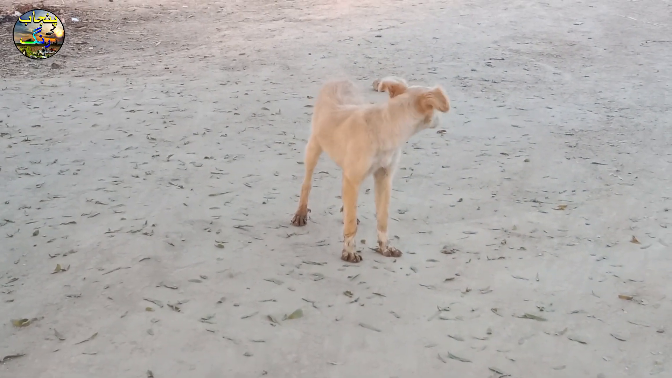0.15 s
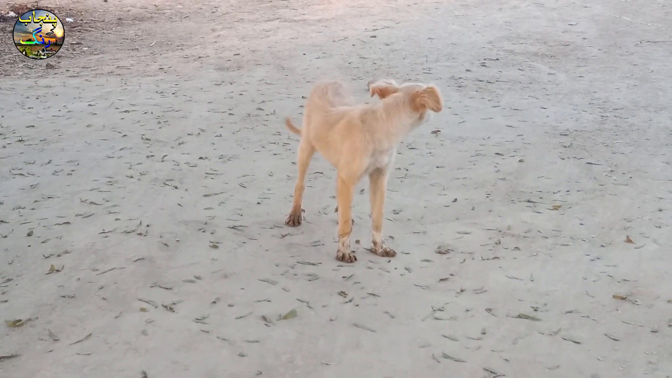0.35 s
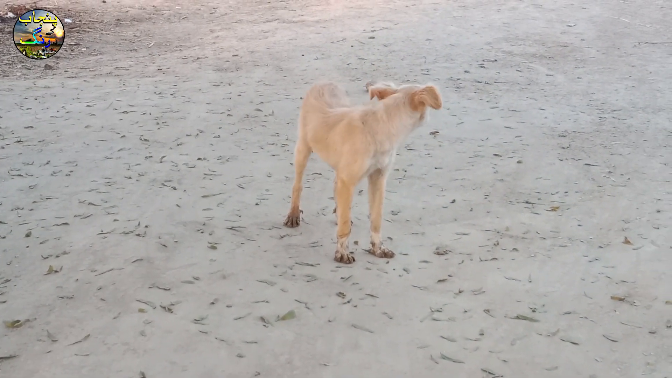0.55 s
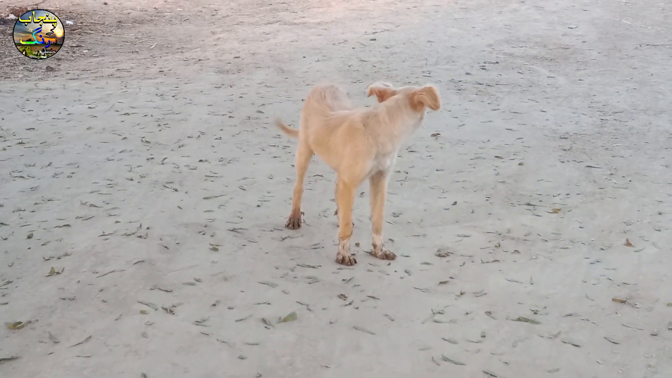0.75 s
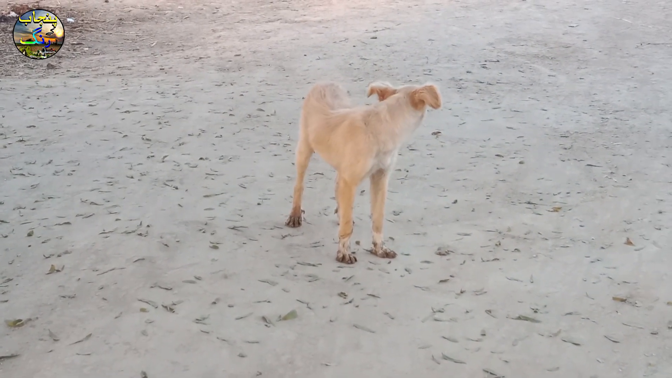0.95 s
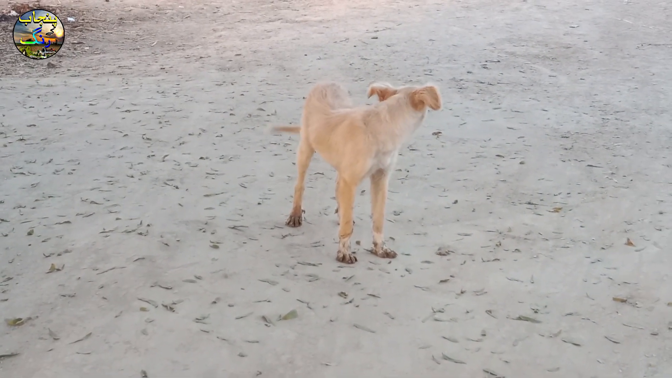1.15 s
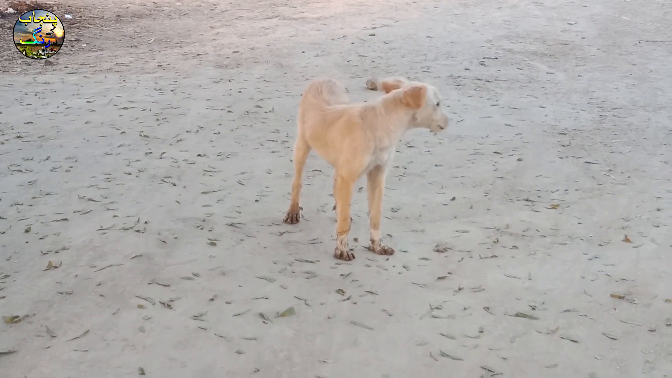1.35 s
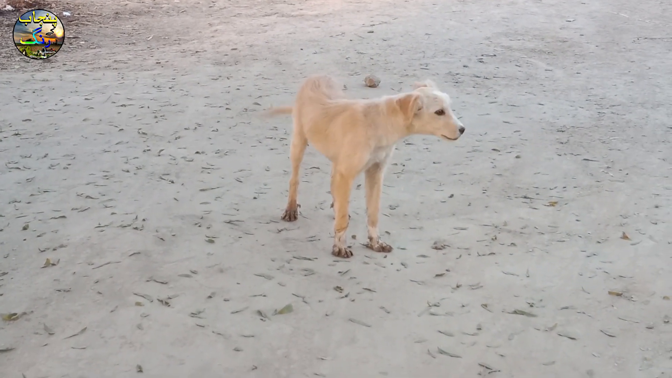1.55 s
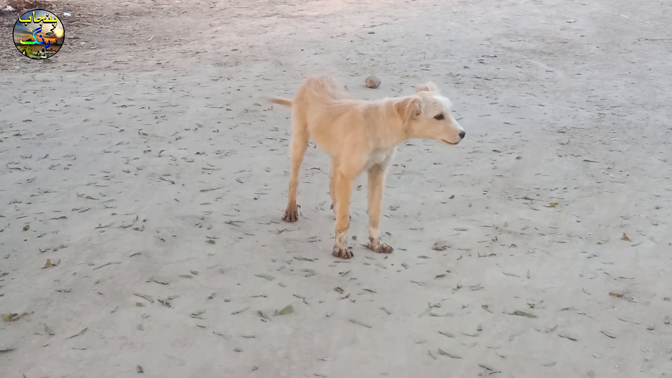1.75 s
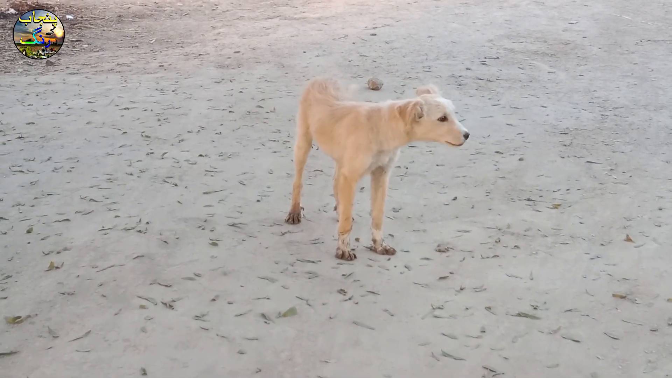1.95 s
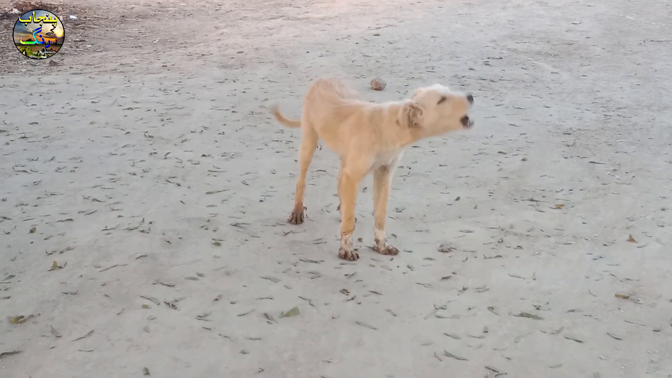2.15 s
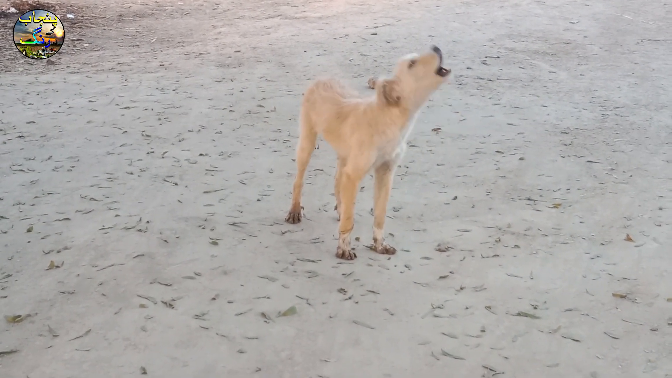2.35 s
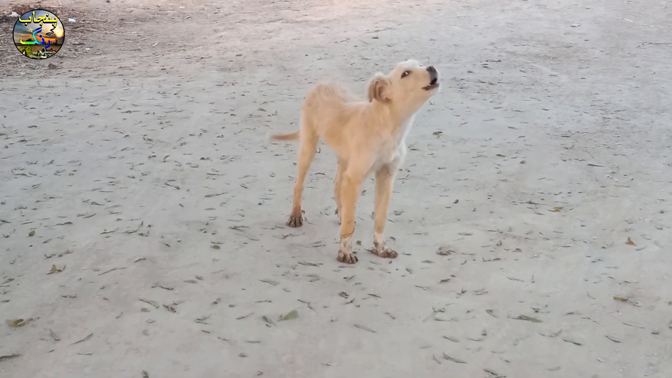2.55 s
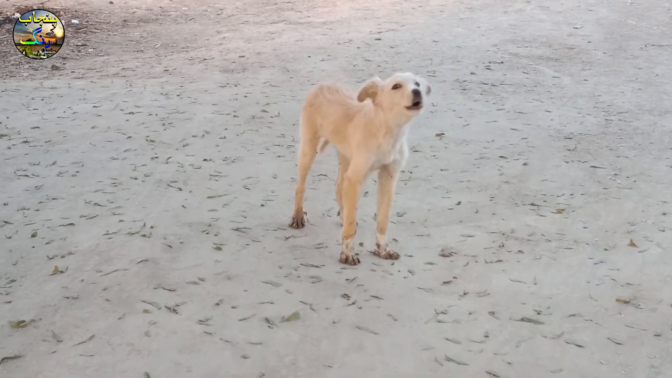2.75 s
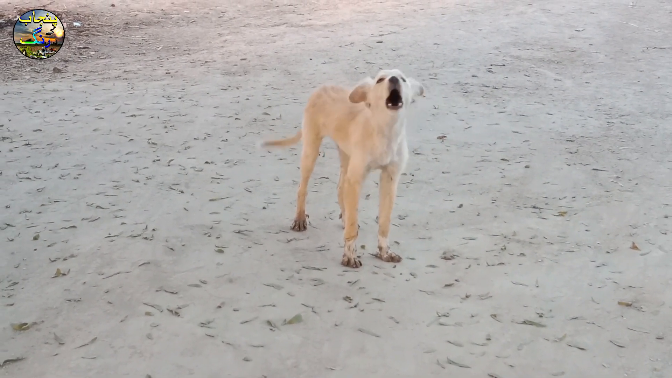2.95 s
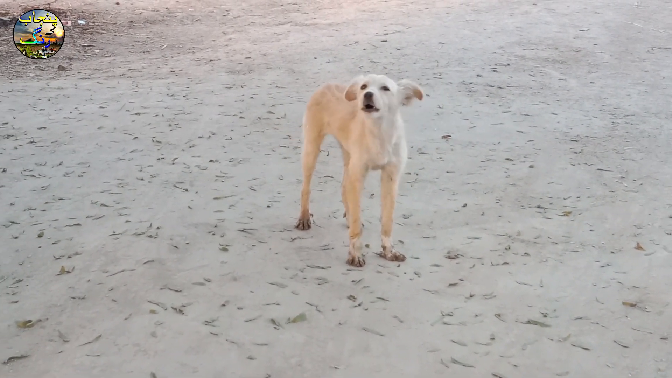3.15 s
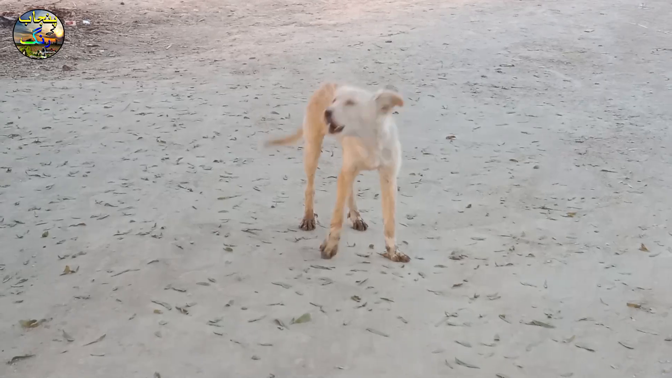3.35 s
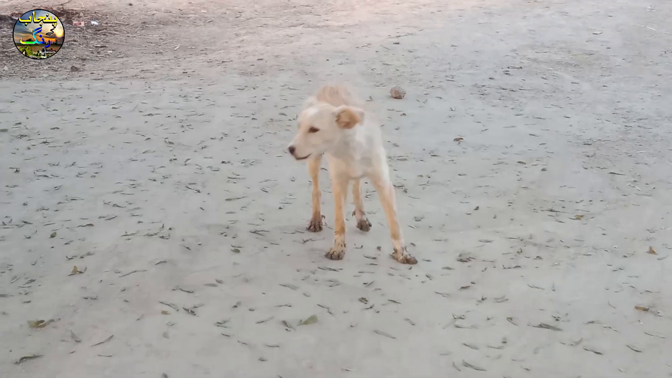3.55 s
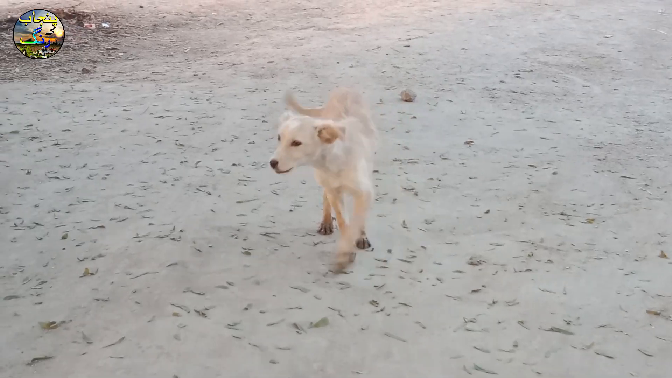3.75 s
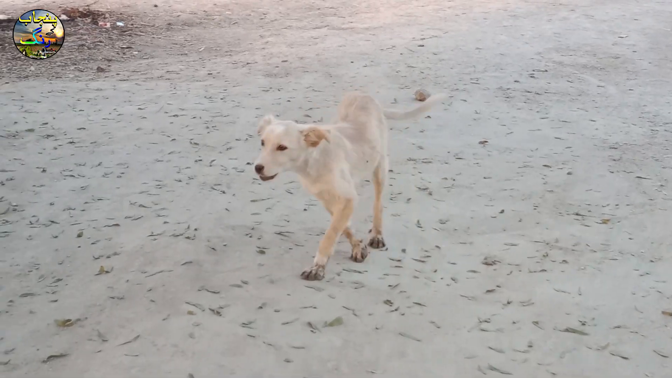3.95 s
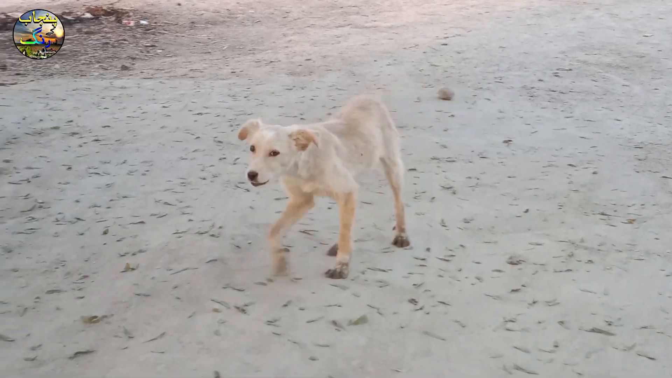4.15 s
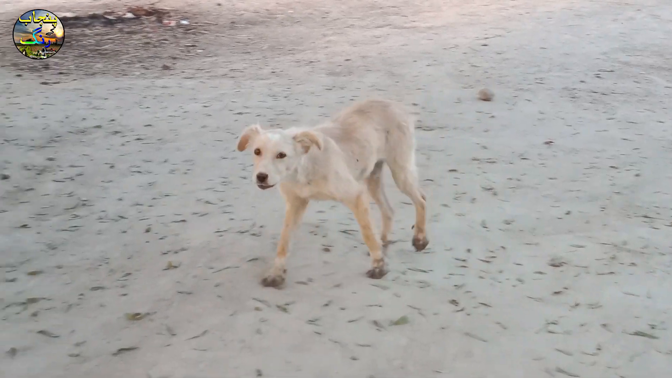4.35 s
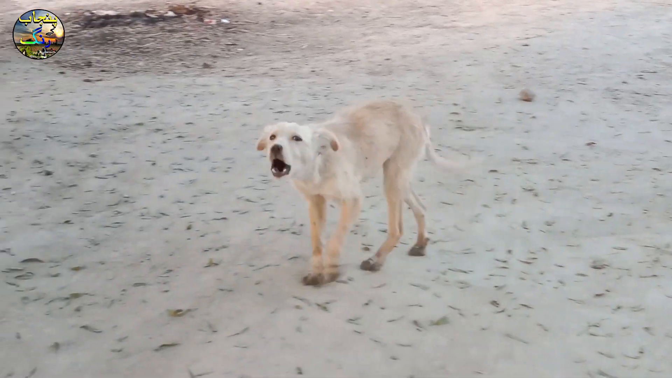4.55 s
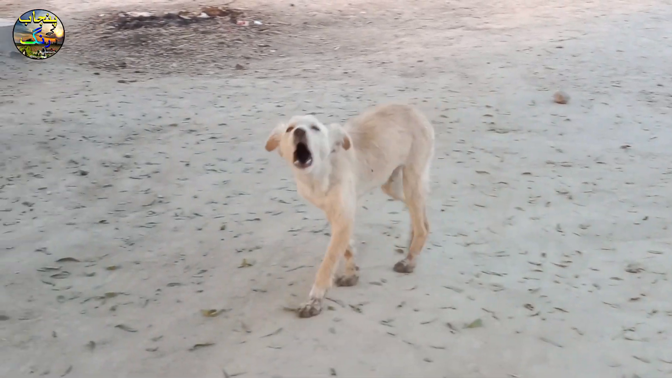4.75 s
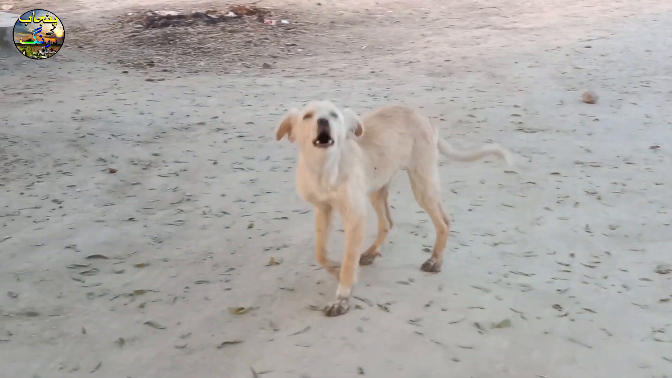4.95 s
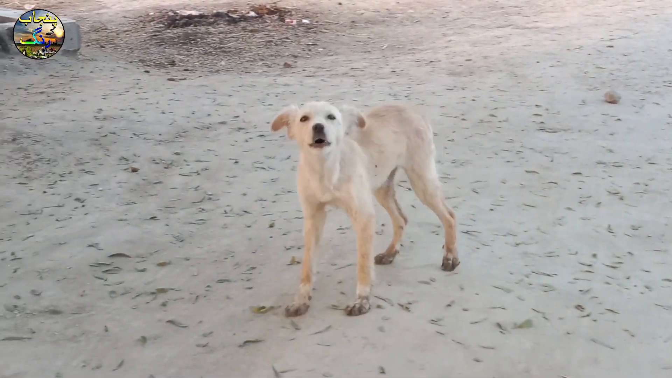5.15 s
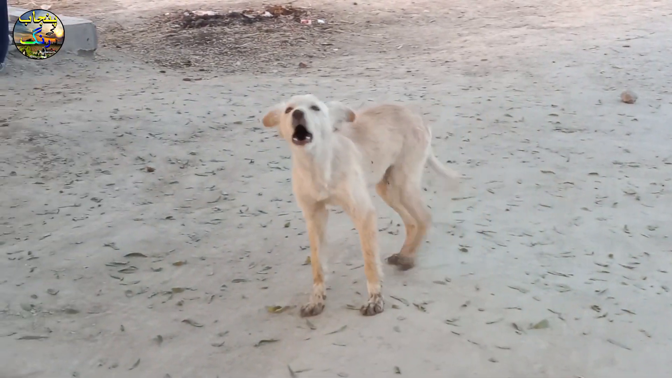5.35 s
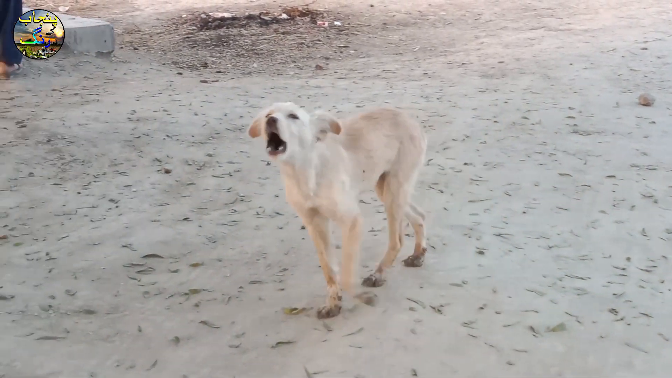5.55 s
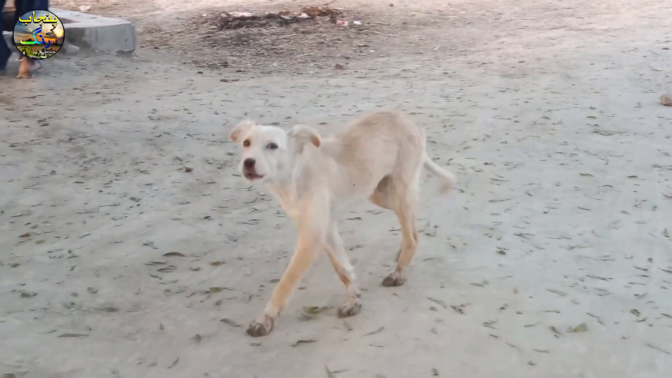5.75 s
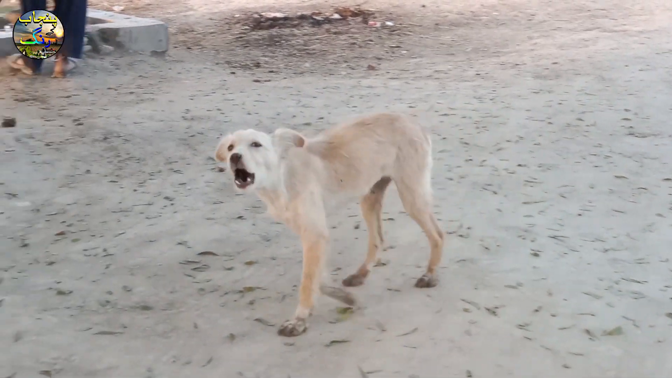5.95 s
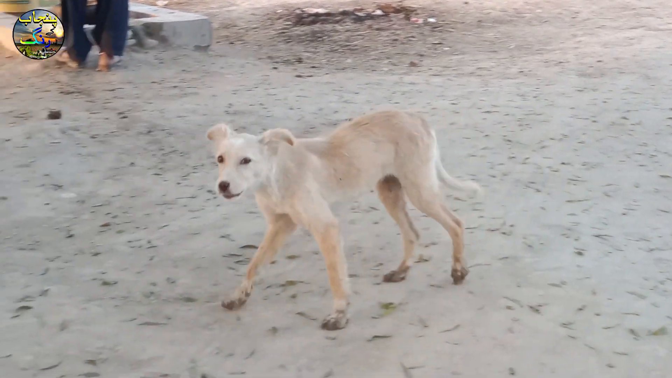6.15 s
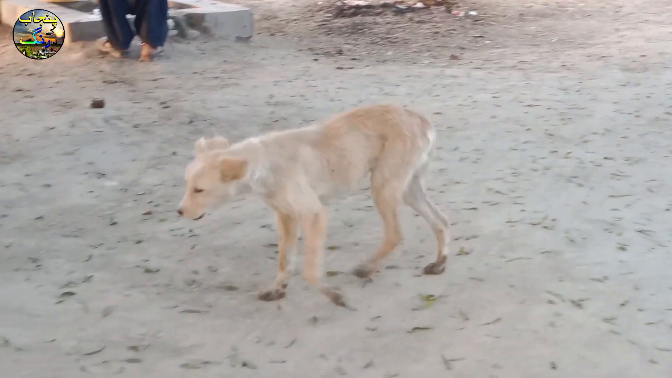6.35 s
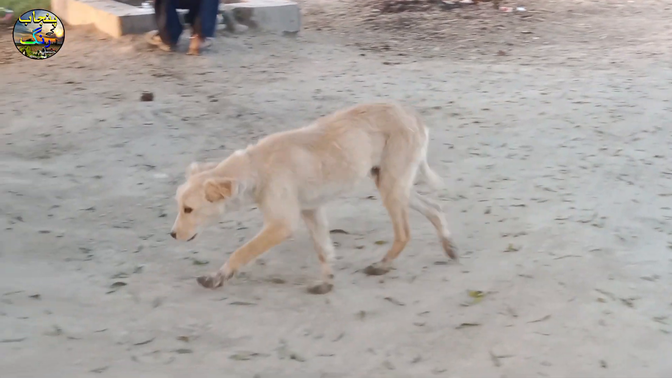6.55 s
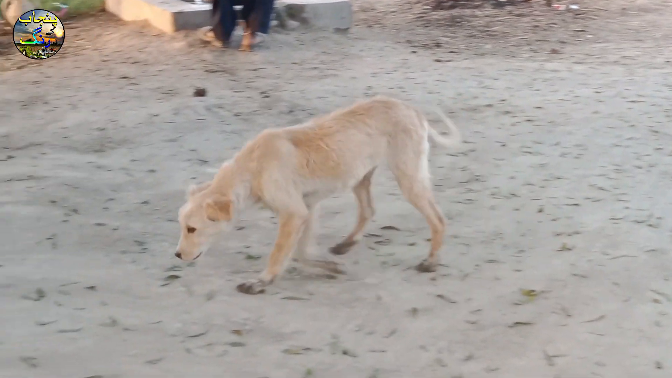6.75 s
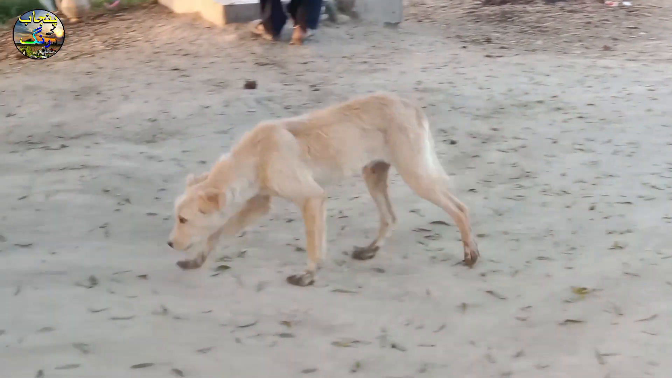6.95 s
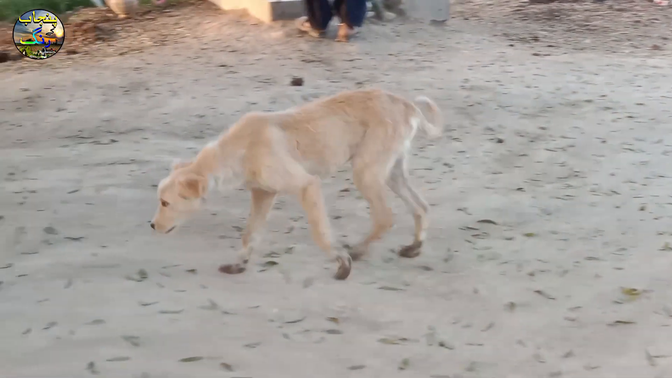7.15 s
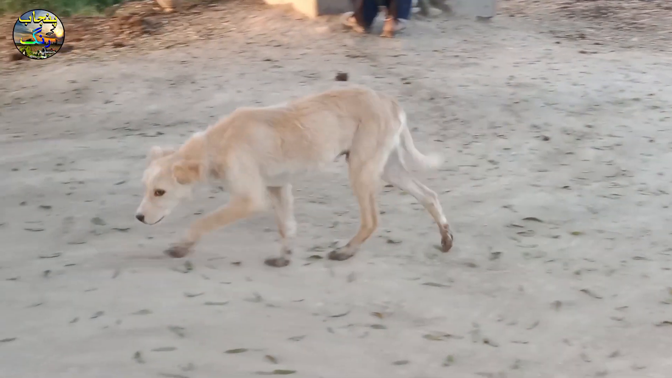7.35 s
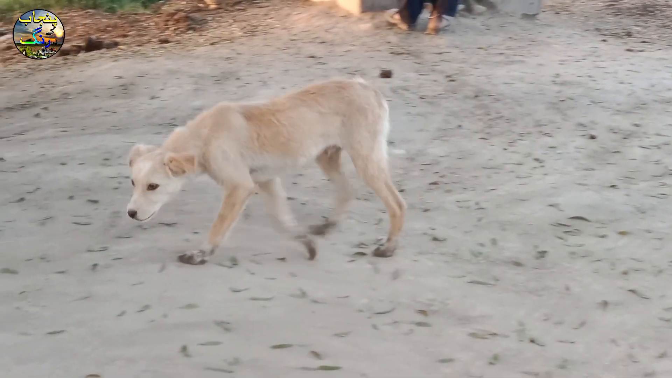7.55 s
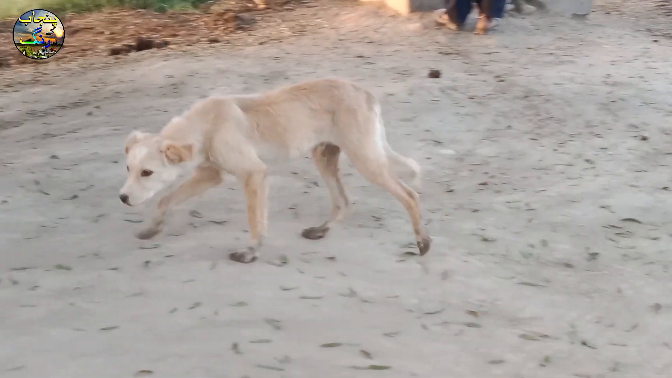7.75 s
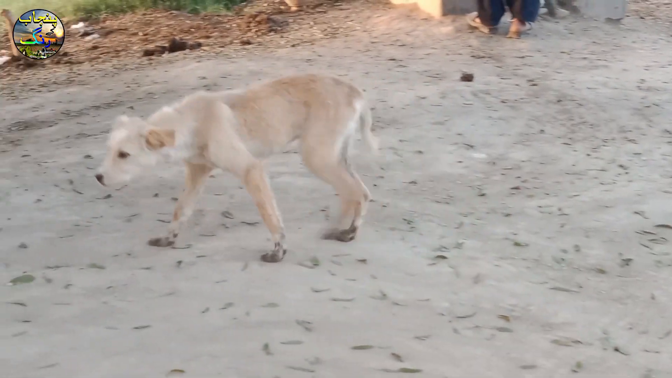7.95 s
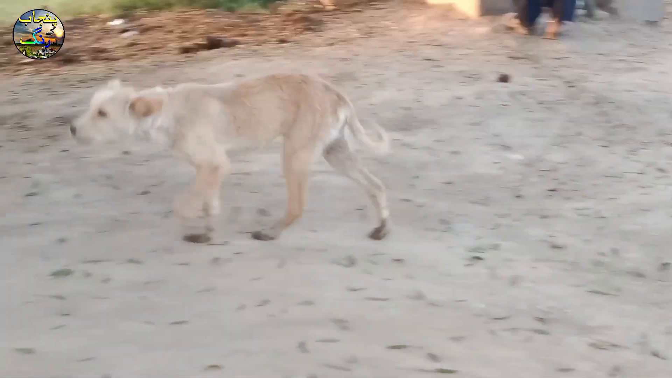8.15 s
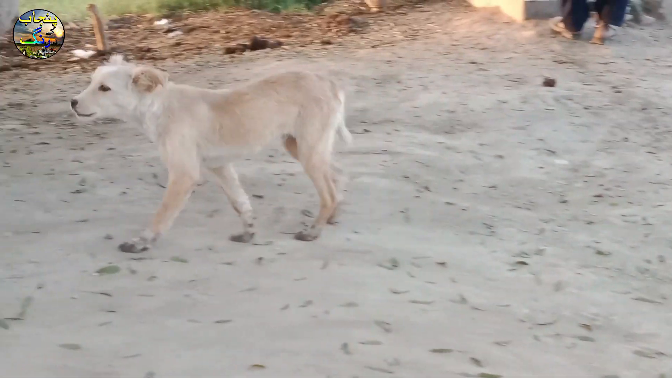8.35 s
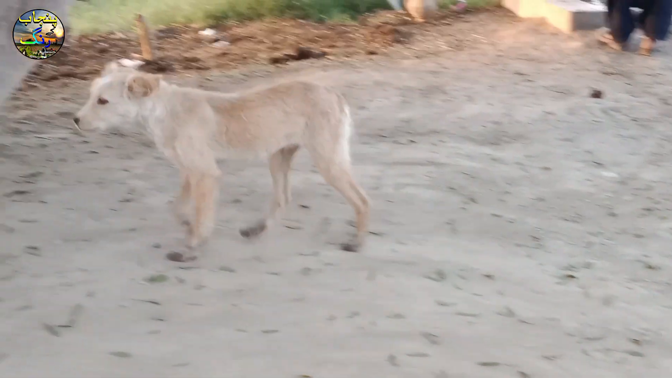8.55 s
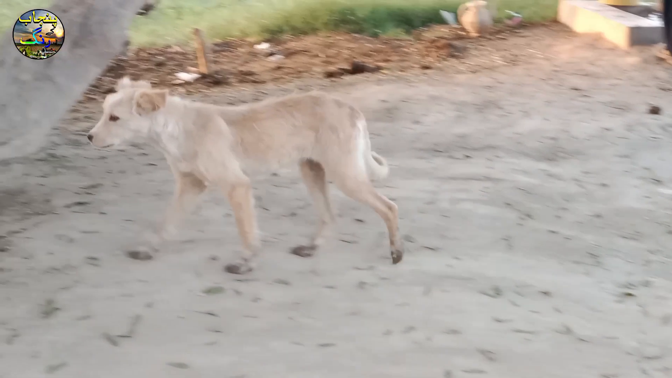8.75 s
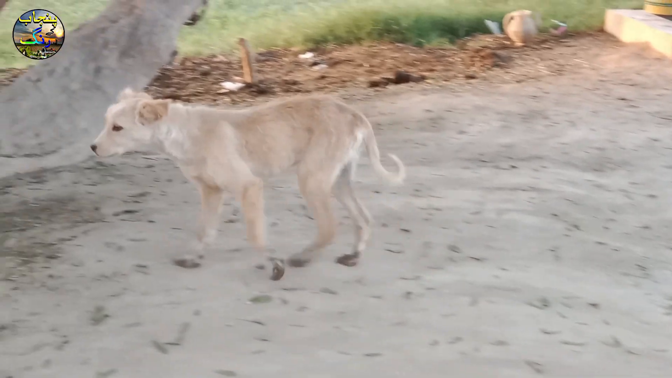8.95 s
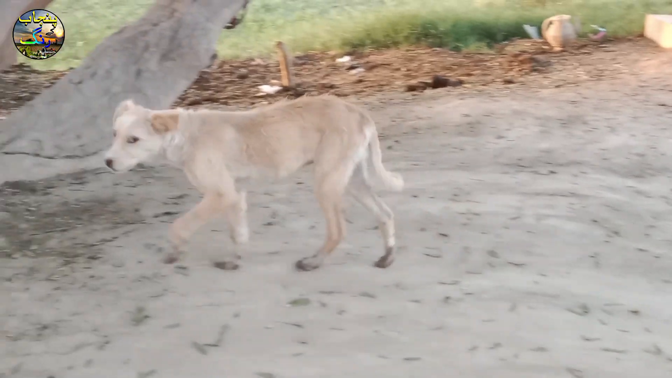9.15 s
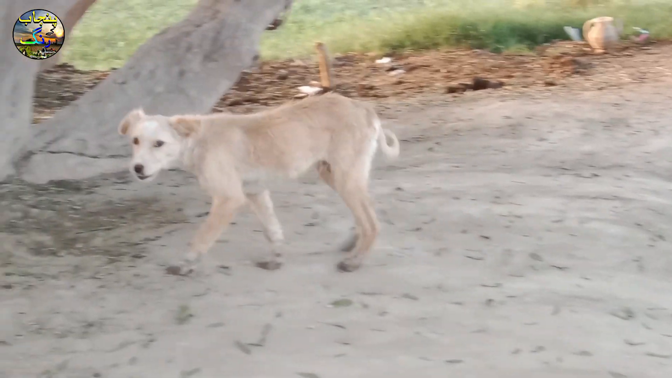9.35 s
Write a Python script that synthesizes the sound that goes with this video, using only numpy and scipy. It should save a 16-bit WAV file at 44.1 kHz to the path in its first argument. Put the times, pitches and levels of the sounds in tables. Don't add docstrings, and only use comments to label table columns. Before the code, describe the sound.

In an open dirt yard, faint sparrow chirps and thin bird whistles come first. A young dog then lets out five high, howl-like yelps joined by rough growls, pauses briefly, and gives six more. Afterwards birds return with light paw scuffs and a quiet, low grumble. The dog is loud and fairly close, with short dull echoes; background hiss comes and goes.

```python
import sys
import numpy as np
from scipy import signal
from scipy.fft import rfft, irfft, next_fast_len
from scipy.io import wavfile
from scipy.ndimage import uniform_filter1d, minimum_filter1d

SR = 44100
rng = np.random.default_rng(int(sys.argv[2]) if len(sys.argv) > 2 else 0)


def volts_from_db(level):
    exponent = np.asarray(level, float) / 20
    return 10 ** exponent


def put_to_file(sound):
    columns = np.atleast_2d(sound).T
    safe = np.clip(columns, -1, 1)
    whole_steps = np.round(safe * 32767)
    wavfile.write(sys.argv[1], SR, whole_steps.astype(np.int16))


N = 413638

# (top reached [s], hold [s], top pitch [Hz], pitch when left [Hz], level [dB])
YELPS = [
    [(2.088, .051, 1140, 1141, -14.5), (2.335, .064, 904, 941.3, -10.5), (2.598, .034, 952.6, 972, -13.5),
     (2.878, .034, 993, 1008, -12), (3.22, .018, 1118, 1181, -13.5)],
    [(4.452, .067, 1106, 1043, -11), (4.694, .081, 904, 934.6, -10), (4.968, .044, 941.3, 941.4, -13),
     (5.255, .034, 960, 1012, -9), (5.525, .023, 936.6, 981, -9.5), (5.868, .019, 1151, 1130, -15)],
]
# (time from the crack [s], upper-octave pitch [Hz])
ONSET = [(-.06, 387.7), (-.025, 497.4), (0, 600)]
# (time from its end [s], upper-octave pitch [Hz])
RELEASE = [(.013, 693.9), (.04, 575.4), (.066, 440)]
# (frequency [Hz], width [Hz], level [dB])
THROAT = [(157.4, 35, -11.5), (599, 202, 8.5), (960, 290, 1.5), (1291.6, 160, 2.5), (1818, 320, -0.5),
          (2306, 62, -6.5), (2993, 990, -16), (4700, 760, -34.5), (5580, 460, -30.5), (6450, 250, -26),
          (7505, 700, -22.5), (11500, 3600, -52.5)]
# (time [s], pitch [Hz], level [dB], mouth opening [dB])
GRUMBLE = [
    [(7.57, 190, -96, 19), (7.608, 195, -52, -33), (7.66, 192, -85, -1)],
    [(7.89, 117.6, -59, -9), (7.966, 138.5, -43, -15), (8.092, 142.6, -38, 7), (8.31, 130.2, -43, -8.5),
     (8.358, 134, -41, -5.5), (8.404, 189, -40, -20), (8.47, 170, -41, -31)],
    [(8.4, 186.5, -39, -15), (8.526, 199, -49.5, -22), (8.63, 198, -66.5, -8), (8.708, 169.6, -65.5, 2),
     (8.78, 168, -67, 20)],
    [(9.13, 175, -43, -25), (9.152, 180, -49, -32), (9.26, 176.3, -61.5, -17), (9.3, 174, -83, 12)],
]
# (delay [s], level [dB])
BIRD_ECHOES = [(.006, 4.5), (.017, -7.5), (.031, -8.5), (.047, -20), (0.069, -25.5), (.095, -32),
               (0.124, -41)]
# (delay [s], level [dB])
DOG_ECHOES = [(.008, -4.5), (.02, -11.5), (.036, -27.5), (.055, -20.5), (.078, -29.5), (.1, -24.5),
              (.13, -35)]
# (delay [s], length [s], top [Hz], end [Hz], level [dB])
DROP = [(0, 0.036, 5670, 3497, -1.5), (.021, .061, 4700, 2415, 3)]
STAIR = [(0, 0.037, 5290, 4800, -11), (.015, 0.049, 4910, 3420, -1.5), (.052, .05, 3550, 2720, 1)]
PAIR = [(0, 0.059, 5610, 2176, -0.12), (.082, 0.062, 3386, 2910, -4.6)]
PEEP = [(0, 0.0327, 3740, 3455, 0), (0, 0.0189, 6490, 5180, 0.0055)]
SLIDE = [(0, .045, 6500, 3700, 0)]
CHIP = [(0.0027, .05, 3600, 2550, 0)]
# (time [s], peak level [dB], pitch factor [x], time factor [x])
DROP_TIMES = [(0.032, -37.5, 1.063, 1.12), (2.216, -38, 1.16, 0.76), (3.905, -35, 1.02, .95),
              (5.373, -39, 1.14, 1.15)]
STAIR_TIMES = [(0.478, -34, 1.085, 0.92), (3.011, -30, 1.1, 1), (5.915, -33.5, 1.05, 1),
               (7.502, -37, 1.07, 1.165), (8.878, -38, 1.105, 1.13)]
PAIR_TIMES = [(0.943, -37, 1.05, 0.9), (3.434, -37.5, 1.01, 0.89), (6.451, -42, .98, 0.91)]
PEEP_TIMES = [(8.162, -40.5, 1.02, 1.15), (8.371, -37.5, 1.1, 1.06)]
SLIDE_TIMES = [(8.405, -34.5, 1.01, 1), (8.465, -36, 0.9, 1.2), (8.686, -44.5, .89, .9)]
CHIP_TIMES = [(1.401, -55.5, 0.91, 0.59), (1.436, -52, 1.01, 0.57), (1.527, -43.5, 1.29, 0.36),
              (1.679, -65, 0.92, 0.39), (1.824, -41, 1.15, 1.26), (1.872, -38, 1.02, 0.82),
              (2.455, -54, 0.88, 0.64), (7.038, -34, 1.154, 1.23), (7.116, -32, 1.126, 0.76),
              (7.226, -54.5, 1.5, 0.37), (7.705, -53, 1.66, 2.04), (7.729, -46, 1.21, 0.54),
              (7.938, -43, 1.25, 0.57), (8.019, -36, 1.13, 1.13), (8.064, -39, 1.11, 1.02),
              (8.429, -37, 1.6, .6), (8.46, -39.5, 1.18, 0.57), (9.275, -47, 1.09, 0.93)]
# (time [s], length [s], start [Hz], end [Hz], peak level [dB])
WHISTLES = [(0.169, 0.067, 3580, 4040, -55.5), (0.809, 0.13, 2918, 2920, -35.5),
            (0.864, 0.094, 7000, 5860, -70), (0.996, 0.091, 4250, 4300, -50),
            (1.042, 0.133, 4180, 4210, -70), (1.181, 0.18, 4120, 2760, -42.5),
            (3.72, 0.089, 6050, 7560, -56.5), (6.733, 0.095, 3265, 2860, -77),
            (6.933, 0.077, 3070, 3260, -37.5), (7.244, 0.067, 3670, 3645, -41),
            (7.4, 0.083, 4600, 4780, -68.5), (9.3, .08, 3490, 3650, -44)]
# (time [s], length
# [s], level [dB])
SCUFFS = [(.29, 0.067, -69), (1.206, 0.063, -69), (1.676, 0.023, -67), (3.294, 0.071, -39),
          (4.27, .08, -68.5), (5.981, 0.13, -41.5), (6.285, 0.067, -54.5), (6.576, 0.086, -59),
          (8.005, 0.048, -38), (8.772, .1, -66.5), (9.04, 0.0804, -71), (9.135, 0.098, -50.5),
          (9.324, .05, -45.5)]
# (time [s], level [dB])
MURMUR = [(0, -73.5), (2, -62), (3.5, -55), (6.5, -50), (8, -61.5), (9.38, -53.5)]
# (frequency [Hz], level [dB per Hz])
MURMUR_COLOUR = [(180, -42.5), (300, -13), (366, -35), (530, -28.5), (701, -2), (903, -6), (1020, -19.5),
                 (1240, -5), (2250, -6), (2600, -2.5), (3380, -44.5), (5720, -120)]
# (frequency [Hz], level [dB per Hz])
HISS_COLOUR = [(1410, -37.5), (2400, -11), (2530, -18), (2740, 3), (3130, 1.5), (4080, -5.5), (7050, -10.5),
               (9120, -33), (15500, -27.5)]

GROWL_HZ, TAIL_S = [168.3, 200.1], [.15, .24]
GROWL_SAG_HZ_PER_S = 330
CLIMB_HZ_PER_S, SNAP_HOLD_S = 9300, .074
FIRST_CLIMB_S, FIRST_HOLLOW_DB = .047, -9
SWELL_DB_PER_S, FIRST_SWELL_DB_PER_S, FADE_DB_PER_S = 265.5, 1004, 229.5
GROWL_DB, GROWL_FADE_DB_PER_S = -23.5, 39
LAST_FADE_DB_PER_S = 150
FULL_AFTER_S, FULL_LASTS_S = 0.016, 0.0027
CLIMB_DB, HOLD_GAIN_DB_PER_S = 5, 118
BRIGHT_DB, DULL_PER_DB, FIRST_BRIGHT_DB = 3, 0.75, 6.5
CHEST_DB, CHEST_BELOW_HZ = -43, 525
TAUT_DB, PURE_BELOW_HZ = 4.5, 1090
ARCH_START = .75
WHISTLE_PEAK, WHISTLE_BEND = 0.94, 2.2
WHISTLE_START_DB, WHISTLE_END_DB = -25.5, -6.5
HISS_DB, DUCK_DB = -57.5, -7
SHUT_DB = -32
OPENS_DB, WIDE_DB, CLOSES_DB_PER_S = -78.5, -37.5, 340
TREBLE_HZ, TREBLE_DB = 2410, -3


def rms_one(x):
    return x / np.sqrt(np.mean(x ** 2) + 1e-20)


def in_time(rows, start=0, stop=N):
    s, *columns = np.transpose(rows)
    t = np.arange(start, stop) / SR
    return [np.interp(t, s, column) for column in columns]


def drift(rate_hz, size):
    sos = signal.butter(2, rate_hz, fs=SR, output="sos")
    return rms_one(signal.sosfilt(sos, rng.standard_normal(size + 4000))[4000:])


def turning(pitch):
    return 2 * np.pi * np.cumsum(pitch) / SR


def barks():
    out = np.zeros(N)
    for run, growl_hz, tail in zip(YELPS, GROWL_HZ, TAIL_S):
        cracks = []
        for top_s, hold, top_hz, _, _ in run:
            cracks.append(top_s - (top_hz - 600) / CLIMB_HZ_PER_S / (1 + (hold > SNAP_HOLD_S)))
        cracks[0] = run[0][0] - FIRST_CLIMB_S
        start = int((cracks[0] - .045) * SR)
        stop = int((run[-1][0] + run[-1][1] + tail) * SR)
        size = stop - start
        yelp_hz = bark_pitch(run, cracks, growl_hz, start, stop)
        level_db, bright_db = effort(run, cracks, start, stop)
        bright_db -= 12 * np.clip((560 - yelp_hz) / 150, 0, 1)

        steady = np.abs(np.gradient(np.log(yelp_hz))) * SR < 2.5
        taut = uniform_filter1d(1. * (steady & (yelp_hz > 800)), size=500)
        odd = np.clip((600 - yelp_hz) / 60, 0.21 * (1 - taut), 1)
        odd[:int(.075 * SR)] = .45
        sound = voice(yelp_hz / 2, odd, bright_db, 1 - .9 * taut, jitter=.016, breath_db=-24, even=.7)
        sound = signal.sosfilt(signal.butter(6, 420, "high", fs=SR, output="sos"), sound)

        onset = signal.windows.tukey(int(.16 * SR), .3)[int(.08 * SR):]
        low = signal.sosfiltfilt(signal.butter(3, 950, fs=SR, output="sos"), sound[:len(onset)])
        sound[:len(onset)] -= (1 - volts_from_db(FIRST_HOLLOW_DB)) * onset * low

        chest_phase = turning(yelp_hz * (1 + .06 * drift(44, size))) / 2
        chest = np.clip((CHEST_BELOW_HZ - yelp_hz) / 90, 0, 1) * np.sin(chest_phase)
        chest *= volts_from_db(CHEST_DB) * volts_from_db(3.5 * drift(30, size))
        chest[:int(.1 * SR)] = 0
        fade = np.minimum(1, np.arange(size)[::-1] / 900)
        out[start:stop] += fade * (volts_from_db(level_db + TAUT_DB * taut) * sound + chest)
    return out


def bark_pitch(run, cracks, growl_hz, start, stop):
    knots = []
    for (top_s, hold, top_hz, left_hz, _), s, after in zip(run, cracks, cracks[1:] + [None]):
        climb, end = top_s - s, top_s + hold
        wait = after - end - .15 if after else .03
        low_hz = growl_hz - GROWL_SAG_HZ_PER_S * wait
        valley = (end + after) / 2 + .008 if after else end + .13
        if knots:
            knots += [(s + d, hz) for d, hz in ONSET]
            knots += [(s + 0.6 * climb, 600 + 0.74 * (top_hz - 600))]
        else:
            knots += [(s - .025, 420), (s, 640), (s + climb - .013, 735)]
        knots += [(s + climb, top_hz), (end, left_hz)]
        knots += [(end + d, hz) for d, hz in RELEASE]
        knots += [(valley, 2 * low_hz)]
    return uniform_filter1d(in_time(sorted(knots), start, stop)[0], size=260)


def effort(run, cracks, start, stop):
    t = np.arange(start, stop) / SR
    levels = []
    for (top_s, hold, _, _, db), s in zip(run, cracks):
        swell = SWELL_DB_PER_S if levels else FIRST_SWELL_DB_PER_S
        trail = LAST_FADE_DB_PER_S if s == cracks[-1] else GROWL_FADE_DB_PER_S
        after = np.maximum(t - top_s - hold - FULL_LASTS_S, 0)
        before = np.maximum(s + FULL_AFTER_S - t - (0 if levels else .008), 0)
        fade = np.maximum(-FADE_DB_PER_S * after, GROWL_DB - trail * after)
        climb = np.interp(t, [s + FULL_AFTER_S, top_s + hold], [CLIMB_DB - HOLD_GAIN_DB_PER_S * hold, 0])
        levels.append(db + climb + fade - swell * before)
    level_db = np.max(levels, axis=0)
    first = FIRST_BRIGHT_DB * np.clip((run[0][0] + run[0][1] + .05 - t) / 0.099, 0, 1)
    return level_db, BRIGHT_DB - DULL_PER_DB * np.maximum(level_db + 28.5, 0) + first


def voice(pitch, odd, bright_db, slack, jitter, breath_db, even):
    size = len(pitch)
    phase = turning(pitch * (1 + jitter * slack * drift(80, size)))
    tone, power = np.zeros(size), np.zeros(size)
    coarse = np.arange(0, size, 32)
    flicker = rms_one(uniform_filter1d(rng.standard_normal((45, len(coarse))), size=12, axis=1))
    pure = (1 - slack[coarse]) * np.clip((PURE_BELOW_HZ - 2 * pitch[coarse]) / 130, .3, 1.3)
    for k in range(1, 45):
        hz = k * pitch[coarse]
        tight_db = -pure * (11 * (k > 2) + 5 * (k == 4))
        lift_db = bright_db[coarse] * np.clip(hz / 2500 - .2, 0, 1)
        share = odd[coarse] if k % 2 else 1
        share = share * np.clip((250 - hz) / 40 if k == 1 else 1, .01, 1)
        share = share * volts_from_db(min(.9 * (k - 2), 6.5) * flicker[k])
        gain = share * throat(hz) * volts_from_db(tight_db + lift_db) * (hz < 15000)
        gain = np.interp(np.arange(size), coarse, gain)
        tone += gain * np.sin(k * phase + rng.uniform(0, 2 * np.pi))
        power += gain ** 2 / 2

    wide = next_fast_len(size)
    hz = np.arange(wide // 2 + 1) * SR / wide
    air = rms_one(irfft(rfft(rng.standard_normal(wide)) * throat(hz) * (hz > 380), wide))[:size]
    air *= 1 + 0.84 * np.cos(phase)
    air *= volts_from_db(breath_db - 14 * (1 - slack) + 3.0 * drift(40, size))
    shimmer = volts_from_db(2 * slack * drift(60, size))
    return shimmer * tone / power ** (even / 2) + air


def throat(hz):
    pocket_db = -8 * np.exp(-((hz - 4150) / 380) ** 2) - 2.7 * np.exp(-((hz - 370) / 110) ** 2)
    power = sum(volts_from_db(2 * db) / (1 + (2 * (hz - f) / width) ** 2) ** 2 for f, width, db in THROAT)
    return np.sqrt(power) * volts_from_db(pocket_db)


def grumble():
    out = np.zeros(N)
    for rows in GRUMBLE:
        start, stop = int(rows[0][0] * SR), min(N, int(rows[-1][0] * SR))
        pitch, level_db, mouth_db = in_time(rows, start, stop)
        size = stop - start
        phase = turning(pitch * (1 + .06 * drift(40, size)))
        hum = np.sin(phase) * volts_from_db(4 * drift(30, size))
        second = np.where(pitch < 160, .8, .07)
        hum += second * np.sin(2 * phase) * volts_from_db(5 * drift(30, size))
        mouth = voice(pitch, np.ones(size), np.full(size, 3.), np.ones(size), jitter=.045, breath_db=-32, even=1)
        mouth = signal.sosfilt(signal.butter(4, 330, "high", fs=SR, output="sos"), mouth)
        out[start:stop] += volts_from_db(level_db) * signal.windows.tukey(size, .2) * (hum + volts_from_db(mouth_db - 5) * mouth)
    return out


def sparrows():
    out = np.zeros(N)
    songs = [(DROP, DROP_TIMES), (STAIR, STAIR_TIMES), (PAIR, PAIR_TIMES),
             (PEEP, PEEP_TIMES), (SLIDE, SLIDE_TIMES), (CHIP, CHIP_TIMES)]
    syllables = [(s + slow * delay, slow * length, high * top_hz, high * end_hz, db + part_db)
                 for phrase, times in songs
                 for s, db, high, slow in times
                 for delay, length, top_hz, end_hz, part_db in phrase]
    for s, length, top_hz, end_hz, peak_db in syllables:
        u = np.linspace(0, 1, int(length * SR))
        at = int(s * SR)
        for late, ratio, voice_db in [(0, 0.93, -3), (.1, .8, -8)]:
            v = (u - .3 - late) / np.where(u < .3 + late, .3, .7)
            foot_hz = np.where(v < 0, ARCH_START * top_hz, end_hz)
            pitch = ratio * (top_hz - (top_hz - foot_hz) * np.abs(v) ** 0.92)
            phase = turning(pitch * (1 + .012 * drift(130, len(u))))
            shape = signal.windows.tukey(len(u), .5) * volts_from_db(peak_db + voice_db + 3.7 * drift(200, len(u)))
            out[at:at + len(u)] += shape * (np.sin(phase) + volts_from_db(-35.5) * np.sin(2 * phase))
    return out


def whistlers():
    out = np.zeros(N + SR)
    for s, length, start_hz, end_hz, peak_db in WHISTLES:
        u = np.linspace(0, 1, int(length * SR))
        at = int(s * SR)
        pitch = start_hz + (end_hz - start_hz) * u ** WHISTLE_BEND
        level_db = peak_db + np.interp(u, [0, WHISTLE_PEAK, 1], [WHISTLE_START_DB, 0, WHISTLE_END_DB])
        phase = turning(pitch * (1 + 0.0025 * drift(87, len(u))))
        shape = signal.windows.tukey(len(u), .15) * volts_from_db(level_db + 2.5 * drift(50, len(u)))
        out[at:at + len(u)] += np.sqrt(2) * shape * np.sin(phase)
    return out[:N]


def walls(x, echoes, cut_hz):
    response = np.zeros(int(.25 * SR))
    for s, db in echoes:
        smear = rng.standard_normal(500) * np.exp(-np.arange(500) / 150)
        response[int(s * SR):int(s * SR) + 500] += volts_from_db(db) * smear / np.sqrt(np.sum(smear ** 2))
    echoed = signal.fftconvolve(x, response)[:N]
    return signal.sosfilt(signal.butter(2, cut_hz, fs=SR, output="sos"), echoed)


def suppressor(foreground):
    level_db = 10 * np.log10(uniform_filter1d(foreground ** 2, size=800) + 1e-12)
    slope = CLOSES_DB_PER_S * np.arange(N) / SR
    held_db = np.maximum.accumulate(np.minimum(level_db, WIDE_DB) + slope) - slope
    for s, length, db in SCUFFS:
        at = slice(int(s * SR), int((s + length) * SR))
        held_db[at] = np.maximum(held_db[at], db + 5.5)
    opening = (uniform_filter1d(held_db, size=700) - OPENS_DB) / (WIDE_DB - OPENS_DB)
    return SHUT_DB * (1 - np.clip(opening, 0, 1.3))


def yard(low_shut_db, high_shut_db):
    low_db = in_time(MURMUR)[0] + low_shut_db
    high_db = HISS_DB + high_shut_db
    noise = volts_from_db(low_db + 1.5) * coloured(MURMUR_COLOUR) + volts_from_db(high_db + 11.5) * coloured(HISS_COLOUR)
    cells = signal.stft(noise, nperseg=512)[2]
    chance = uniform_filter1d(rng.standard_normal(cells.shape), size=24, axis=1)
    streaks = rms_one(uniform_filter1d(chance, size=2, axis=0))
    return signal.istft(cells * volts_from_db(9.18 * streaks - 8.5), nperseg=512)[1][:N]


def coloured(spectrum):
    size = next_fast_len(N)
    hz = np.arange(size // 2 + 1) * SR / size + 1
    at, level_db = np.transpose(spectrum)
    gain = volts_from_db(np.interp(np.log(hz), np.log(at), level_db, left=-90, right=-90))
    gain = gain * volts_from_db(-6 * (hz > 9500))
    return rms_one(irfft(rfft(rng.standard_normal(size)) * gain, size))[:N]


def scene():
    dog, chirps, whistles = barks(), sparrows(), whistlers()
    birds = volts_from_db(-5) * chirps + volts_from_db(-8) * whistles
    echoes = walls(birds, BIRD_ECHOES, 7100) + walls(dog, DOG_ECHOES, 5000)
    foreground = dog + chirps + whistles + echoes + grumble()
    dog_sounds = 1. * (uniform_filter1d(dog ** 2, size=2000) > volts_from_db(-76))
    ducked_db = DUCK_DB * uniform_filter1d(dog_sounds, size=2000)
    treble = signal.sosfilt(signal.butter(4, TREBLE_HZ, "high", fs=SR, output="sos"), foreground)
    low_shut_db = suppressor(foreground)
    high_shut_db = suppressor(volts_from_db(TREBLE_DB) * treble) + ducked_db
    return (foreground + yard(low_shut_db, high_shut_db))[None]


def low_pass(x):
    return signal.sosfilt(signal.butter(12, 15710, fs=SR, output="sos"), x)


def record(dry):
    x = signal.sosfilt(signal.butter(3, 105, "high", fs=SR, output="sos"), dry)
    room_left = minimum_filter1d(np.minimum(1, .8 / (np.abs(x) + 1e-9)), size=1300)
    x = x * uniform_filter1d(room_left, size=1200)
    x = signal.sosfilt(signal.cheby2(12, 40, 15700, fs=SR, output="sos"), x)
    return low_pass(x)


dry = scene()
out = record(dry)
put_to_file(out)
```